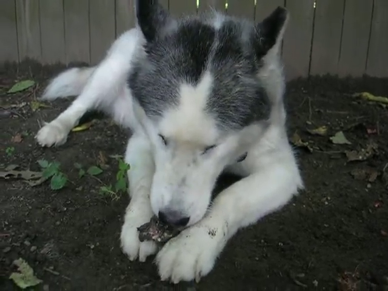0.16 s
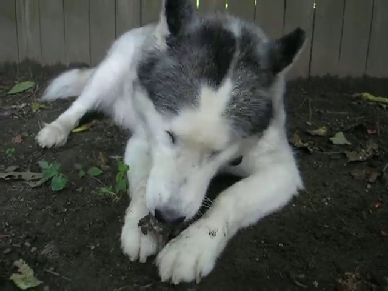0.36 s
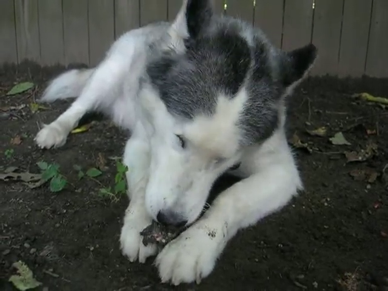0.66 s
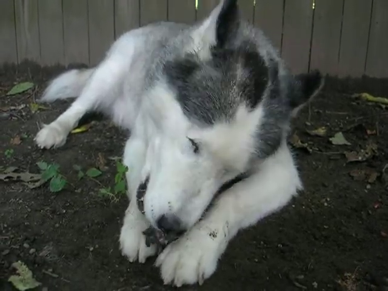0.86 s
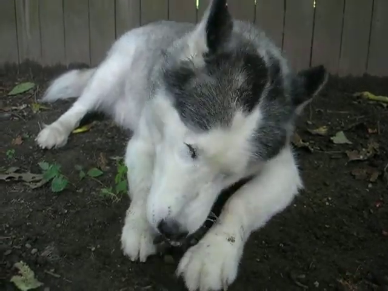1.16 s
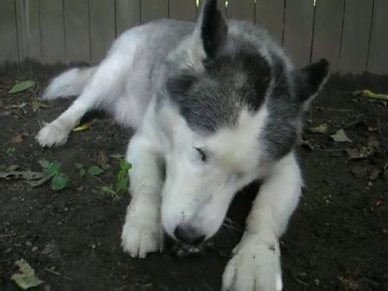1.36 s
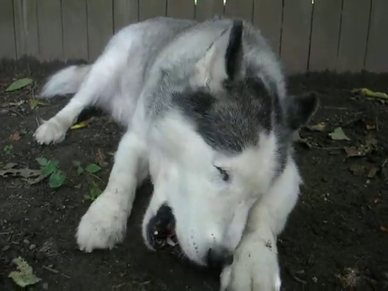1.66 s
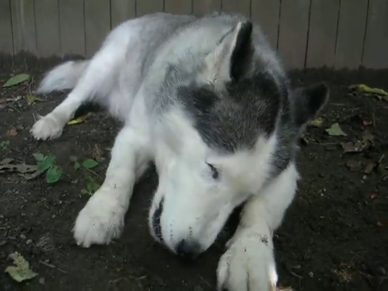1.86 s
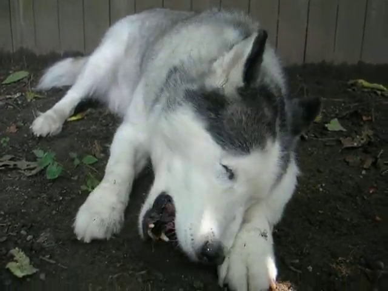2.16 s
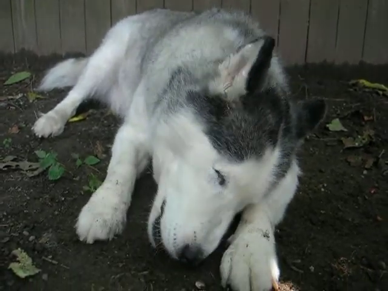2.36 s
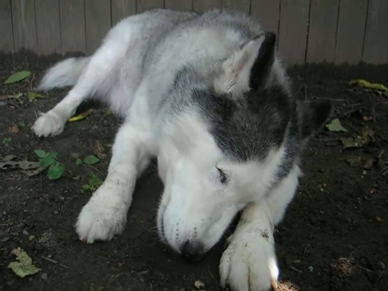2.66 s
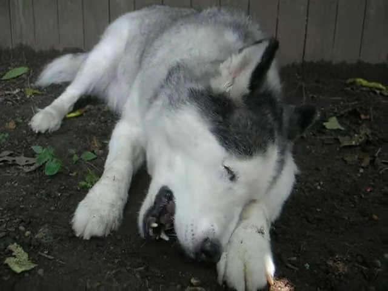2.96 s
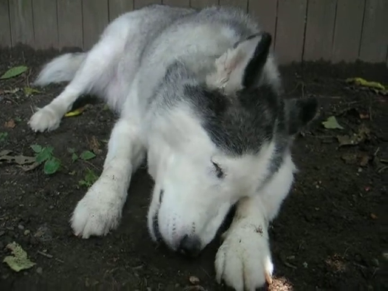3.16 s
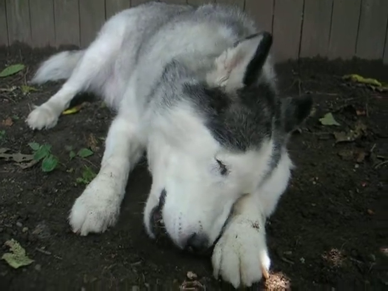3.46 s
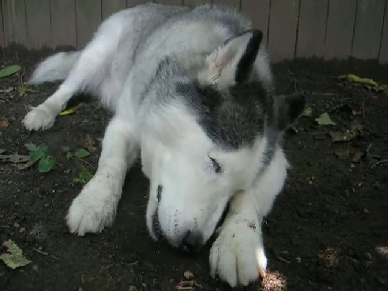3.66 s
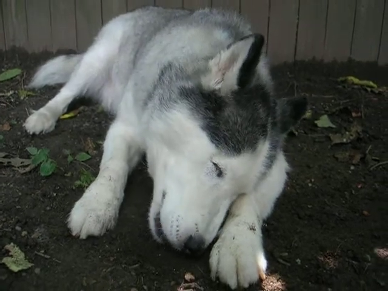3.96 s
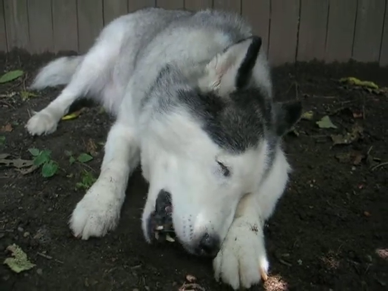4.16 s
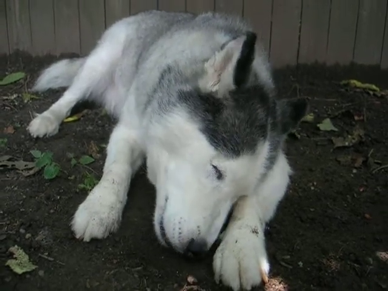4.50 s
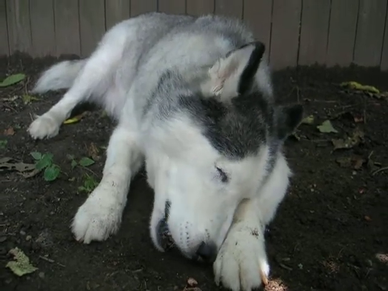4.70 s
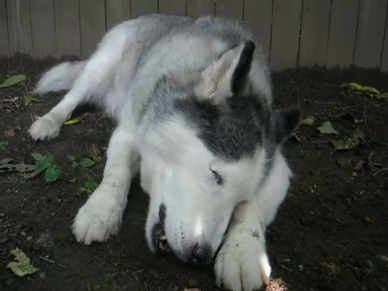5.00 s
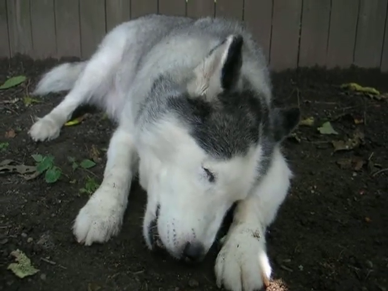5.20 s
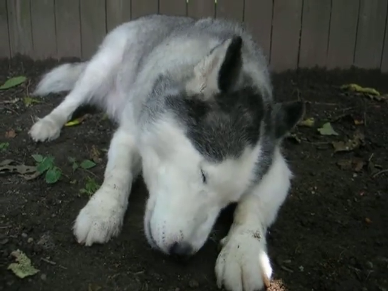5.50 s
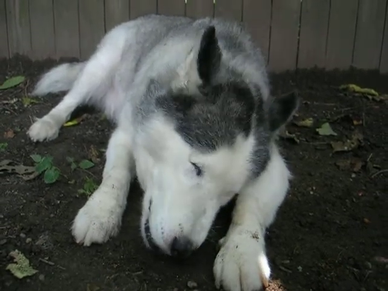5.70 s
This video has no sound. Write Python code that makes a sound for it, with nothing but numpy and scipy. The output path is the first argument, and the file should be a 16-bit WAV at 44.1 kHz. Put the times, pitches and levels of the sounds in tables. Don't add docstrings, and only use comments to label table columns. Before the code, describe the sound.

A dog gnaws a bone outdoors, teeth scraping and grinding, with irregular hollow cracks, chip ticks and a few loud crunches over faint hiss.

```python
import sys
import numpy as np
from scipy import signal
from scipy.io import wavfile
from scipy.ndimage import uniform_filter1d

SR = 44100
rng = np.random.default_rng(int(sys.argv[2]) if len(sys.argv) > 2 else 0)


def decibels_to_gain(level_db):
    exponent = np.asarray(level_db, float) / 20
    return 10 ** exponent


def generate_wav(sig):
    pcm = np.round(np.clip(np.atleast_2d(sig).T, -1, 1) * 32767).astype(np.int16)
    wavfile.write(sys.argv[1], SR, pcm)


N = 257544

# pitch in Hz, width in Hz, level in dB.
SKULL_NOTES = [
    (1040, 130, 0),
    (480, 200, -7),
    (1320, 150, -12),
]


def evened(x):
    return x / np.sqrt(np.mean(x ** 2) + 1e-20)


def peaked(x):
    return x / np.abs(x).max()


def add(mix, s, sound):
    part = mix[round(s * SR):][:len(sound)]
    part += sound[:len(part)]


def band(x, lo_hz, hi_hz):
    return signal.sosfilt(signal.butter(2, [lo_hz, hi_hz], "bandpass", fs=SR, output="sos"), x)


def resonate(x, hz, width):
    turn = np.exp(2j * np.pi * np.cumsum(hz * np.ones(len(x))) / SR)
    r = np.exp(-np.pi * width / SR)
    smooth = signal.lfilter([1 - r], [1, -r], x / turn + 1e-18)
    return 2 * (turn * smooth).real


def yard():
    # pitch in Hz, level in dB per Hz.
    yard_colour = [(41, -37), (70, -11), (178, -4.5), (467, -3.5), (852, -7.5), (925, -9.5), (1170, -10.5),
                   (1380, -15.5), (1600, -13), (3750, -21.5), (4880, -58), (8250, -120)]
    frames, hz = N // 128 + 5, np.fft.rfftfreq(512, 1 / SR)
    a, b, patches = rng.standard_normal((frames, 257, 3)).T
    patches = uniform_filter1d(patches, 6, 0)
    patches = evened(uniform_filter1d(patches, 30, 1))
    f, level_db = np.transpose(yard_colour)
    colour_db = np.interp(np.log(hz + 1), np.log(f + 1), level_db)
    z = (a + 1j * b) * decibels_to_gain(colour_db[:, None] + 1.3 * patches)
    hiss = signal.istft(z, nperseg=512, noverlap=384)[1][:N]
    return decibels_to_gain(-42) * evened(band(hiss, 56, 9000))


def held(t, start, hold, rise_db_per_s, fall_db_per_s):
    before = np.maximum(start - t, 0)
    after = np.maximum(t - start - hold, 0)
    return decibels_to_gain(-rise_db_per_s * before - fall_db_per_s * after)


def strokes():
    # start in seconds, hold in seconds, pressure in dB,
    # mouth cavity pitch in Hz, reach in dB (above 0 front teeth, below 0 back teeth).
    grinding = [(0, 0.014, -44, 690, 1.5), (0.808, 0.072, -46, 736, -2.5), (1.088, 0.15, -43, 834, -3),
                (1.361, 0.055, -43, 767, 1), (1.469, .05, -44, 714, 3.5), (1.799, 0.024, -39.5, 870, 0),
                (2.059, 0.015, -31.5, 749, -0.5), (2.276, 0.14, -39.5, 741, 5.5),
                (2.439, .03, -45.5, 785, -10), (2.591, 0.064, -39.5, 735, -2.5),
                (2.681, 0.092, -44.5, 715, 1), (3.002, 0.35, -51, 770, 8), (3.349, 0.051, -37, 731, -2.5),
                (3.63, .1, -45, 820, 2.5), (3.909, 0.12, -39, 677, -4), (4.29, .03, -41.5, 847, 2.5),
                (4.409, 0.021, -40.5, 802, -7.5), (4.609, .1, -41.5, 733, -1.5),
                (5.0, 0.06, -40.5, 775, -7), (5.1, 0.086, -37.5, 790, -9.5), (5.33, 0.045, -41.5, 800, 1),
                (5.429, 0.059, -42.5, 745, 2.5), (5.54, 0.036, -45, 786, 9.5)]
    # start in seconds, hold in seconds, level in dB.
    scrapes = [(0, 0.19, -52.5), (0.795, .06, -53), (1.072, .06, -56.5), (1.364, 0.17, -48),
               (1.79, 0.031, -52), (2.055, 0.049, -53), (2.272, 0.07, -45.5), (2.583, .08, -50.5),
               (2.97, 0.16, -53), (3.674, 0.055, -47), (3.892, 0.18, -49.5), (4.293, 0.044, -45.5),
               (4.404, 0.047, -52.5), (4.588, .12, -45.5), (4.92, 0.31, -52.5), (5.342, .06, -50),
               (5.423, 0.15, -40), (5.63, .2, -54)]
    t = np.arange(0, N + 64, 64) / SR
    start, hold, press_db, hz, reach_db = np.transpose(grinding)[:, :, None]
    press = decibels_to_gain(press_db) * held(t, start, hold, 270, 262)
    cavity = press / decibels_to_gain(reach_db / 2)
    skull = press * decibels_to_gain(reach_db / 2)
    start, hold, scrape_db = np.transpose(scrapes)[:, :, None]
    rasp = decibels_to_gain(scrape_db) * held(t, start, hold, 138.5, 138.5)
    pitch = (cavity * hz).sum(0) / cavity.sum(0)
    curves = cavity.max(0), pitch, skull.max(0), rasp.max(0)
    return [np.interp(np.arange(N) / SR, t, c) for c in curves]


def grind():
    cavity_gain, cavity_hz, skull_gain, rasp_gain = strokes()
    happens = rng.random(N) < 1500 / SR
    strength = decibels_to_gain(2.2 * np.minimum(rng.exponential(1, N), 4))
    slips = happens * strength * rng.choice([-1, 1], N)
    clumps = uniform_filter1d(rng.standard_normal(N), 400)
    clumps = evened(uniform_filter1d(clumps, 400))
    slips = slips * decibels_to_gain(2.0 * clumps)
    cavity = resonate(resonate(slips, cavity_hz, 120), cavity_hz, 270)
    skull = sum(decibels_to_gain(db) * resonate(resonate(slips, hz, w), hz, 280) for hz, w, db in SKULL_NOTES)
    rasp = band(slips, 930, 2400)
    return cavity_gain * evened(cavity) + skull_gain * evened(skull) + rasp_gain * evened(rasp)


def crack(db, hz, thud_db, splinter_db, t60, noise):
    t = np.arange(len(noise)) / SR
    t60 = np.clip(t60, .008, .3)
    blow = (t == 0) * 12.0 + noise * decibels_to_gain(-60 * t / (0.98 * t60))
    cavity = peaked(resonate(resonate(blow, hz, 2.4 / t60), hz, 670))
    cavity = cavity * decibels_to_gain(-70 * (t / t60) ** 2)
    skull_hz, skull_width = SKULL_NOTES[0][:2]
    skull = peaked(resonate(blow, skull_hz, skull_width))
    muzzle = band(cavity + decibels_to_gain(-21) * skull, 460, 1200)
    thud = peaked(band(band(blow, 290, 610), 130, 600))
    splinters = (t == 0) * 7.1 + noise[::-1] * decibels_to_gain(-60 * t / (3.6 * t60))
    splinters = peaked(band(band(splinters, 1200, 3400), 940, 2700))
    return decibels_to_gain(db) * (muzzle + decibels_to_gain(thud_db - 0.5) * thud + decibels_to_gain(splinter_db - 2.0) * splinters)


def cracks():
    # start in seconds, peak in dB, mouth cavity pitch in Hz, ring time (60 dB) in seconds.
    side_cracks = [(.491, -27, 715, 0.086), (1.187, -27, 895, 0.043), (1.226, -30.5, 1002, 0.16),
                   (1.3062, -19.5, 700, .02), (1.317, -18, 1000, 0.035), (1.7765, -17, 962, 0.052),
                   (1.919, -18, 689, 0.0072), (1.98, -25, 834, 0.012), (2.381, -20, 786, .025),
                   (2.578, -27, 845, 0.038), (2.634, -29, 1000, 0.076), (3.036, -26, 950, 0.032),
                   (3.269, -23, 750, 0.023), (3.378, -42, 760, .039), (5.057, -27.5, 830, 0.046),
                   (5.15, -24, 810, .03), (5.181, -26, 797, 0.019), (5.5085, -10.5, 1060, 0.0087)]
    molar_cracks = [(1.048, -20.5, 973, 0.048), (1.066, -16, 930, 0.03), (1.1, -28, 1017, .026),
                    (1.139, -22, 970, 0.024), (1.158, -20.5, 1020, 0.036), (1.255, -26, 970, 0.04),
                    (1.762, -18.5, 778, 0.016), (1.804, -29, 930, .023), (1.956, -26, 1010, 0.037),
                    (1.966, -23, 1070, .021), (2.056, -31, 1080, 0.057), (2.075, -22, 759, .016),
                    (2.396, -17.5, 703, 0.007), (2.424, -29.5, 690, 0.033), (3.065, -26.5, 1030, 0.036),
                    (4.235, -26.5, 753, 0.013), (4.662, -21, 1136, 0.019), (4.831, -25, 678, 0.016),
                    (4.9733, -16, 994, 0.025)]
    # as for the side, then jaw thud in dB.
    full_bites = [
        (1.058, -14.5, 996, 0.097, -4.5),
        (1.3078, -9, 787, 0.038, -14),
        (1.783, -26, 1010, 0.058, 9.5),
        (4.5596, -15, 610, 0.024, -0.5),
        (4.5629, -7.5, 731, 0.031, -5.5),
        (5.5107, 4.5, 1030, .022, -17),
        (5.5136, 2.5, 1030, .014, -17),
        (5.5161, -8.5, 625, 0.023, -3.5),
    ]
    tip_cracks = [(2.2471, -20, 1110, 0.017), (2.262, -24.5, 727, .065), (2.432, -19.5, 976, .034),
                  (2.481, -46, 640, .033), (2.499, -28, 1010, .061), (2.9672, -35, 1100, 0.0099),
                  (3.2587, -16, 786, .012), (3.3597, -26, 1034, .015), (3.898, -28, 990, 0.018),
                  (4.644, -19, 1080, .014), (4.927, -29.5, 748, .032), (4.955, -25.5, 958, .024),
                  (5.303, -17, 1025, .053), (5.3203, -20, 833, .018), (5.671, -29, 753, .012),
                  (5.805, -23, 1030, 0.028)]
    # thud in dB, splinters in dB, strength of the slips after the snap
    rows = [(*r, -13, -9.5, 0.5) for r in side_cracks]
    rows += [(*r, -7.5, -16, 0.5) for r in molar_cracks]
    rows += [(*r, -12.5, -3.5, 0.5) for r in tip_cracks]
    rows += [(*r, -9.5 + 0.52 * r[1], 0.25) for r in full_bites]
    out, noise = np.zeros(N), rng.standard_normal((len(rows), 4000))
    for (s, db, hz, t60, thud_db, splinter_db, slips), n in zip(rows, noise):
        add(out, s - .0006, crack(db, hz, thud_db, splinter_db, t60, slips * n))
    return out


def chips():
    # start in seconds, peak in dB, pitch in Hz.
    flying_chips = [(1.06, -32.5, 3230), (1.311, -28, 2000), (1.777, -29, 2280), (1.779, -39, 2880),
                    (2.2478, -41, 3370), (2.381, -25, 1460), (2.401, -33, 1945), (2.4313, -33, 2600),
                    (2.491, -31, 2240), (2.578, -27, 1740), (2.608, -33.5, 2660), (2.9625, -27, 2400),
                    (2.9688, -23, 3330), (2.9681, -32.5, 1700), (3.259, -34, 2580), (3.3616, -29, 2380),
                    (3.364, -33, 3800), (3.381, -34, 2330), (3.4, -29, 2500), (3.446, -33.5, 3100),
                    (3.624, -35, 2560), (3.73, -34, 2400), (4.5608, -9, 1770), (4.5634, -8.5, 2000),
                    (5.3013, -30.5, 3650), (5.321, -22, 2700), (5.4216, -34, 2040), (5.63, -29.5, 2860),
                    (5.806, -29, 2900), (5.805, -24.5, 1590)]
    # start in seconds, peak in dB, pitch in Hz, ring time (60 dB) in seconds.
    head_jolts = [
        (4.5588, -18, 202, 0.033),
        (4.569, -17, 990, 0.065),
        (5.509, -24.5, 102.7, 0.032),
        (5.517, -28, 337, 0.0225),
        (5.519, -16, 1676, 0.02),
        (5.5263, -29, 1050, 0.0067),
    ]
    rows = [(*r, .010) for r in flying_chips] + [tuple(r) for r in head_jolts]
    out, t = np.zeros(N), np.arange(2000) / SR
    for (s, db, hz, t60), n in zip(rows, rng.standard_normal((len(rows), 2000))):
        t60 = np.clip(t60, .004, .06)
        blow = (t == 0) * 8.0 + n * decibels_to_gain(-60 * t / t60)
        tick = resonate(resonate(blow, hz, 6 / t60), hz, 0.4 * hz)
        add(out, s - .0003, decibels_to_gain(db) * peaked(tick))
    return out


def fence(x):
    taps = np.zeros(6000)
    at = np.arange(100, 5980, 20)
    taps[at + rng.integers(0, 20, len(at))] = rng.choice([-1., 1.], len(at))
    t = np.arange(6000) / SR
    low = signal.lfilter([.15], [1, -.85], taps)
    treble = taps - low
    tail = low * decibels_to_gain(-60 * t / 0.064) + 0.19 * treble * decibels_to_gain(-60 * t / 0.027)
    return signal.oaconvolve(x, tail / np.linalg.norm(tail))[:N]


def scene():
    bites = cracks() + chips()
    return (yard() + grind() + bites + decibels_to_gain(-18.0) * fence(bites))[None]


def top_cut(x):
    return signal.sosfilt(signal.butter(12, 16300, fs=SR, output="sos"), x)


def record(dry):
    edge_hz, offset, ceiling = 4150, -.0549, .71
    lowpass = signal.firwin(301, edge_hz, window=("kaiser", 9), fs=SR)
    narrow = signal.oaconvolve(dry, lowpass[None], "same")
    clipped = np.clip(narrow + offset, -ceiling, ceiling)
    return top_cut(clipped)


dry = scene()
out = record(dry)
generate_wav(out)
```